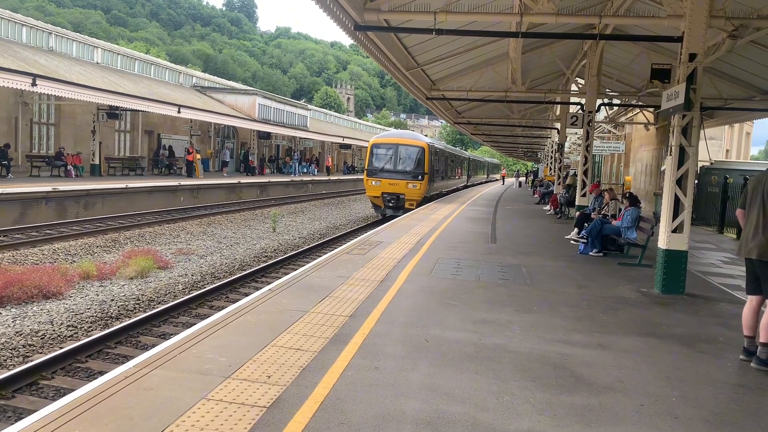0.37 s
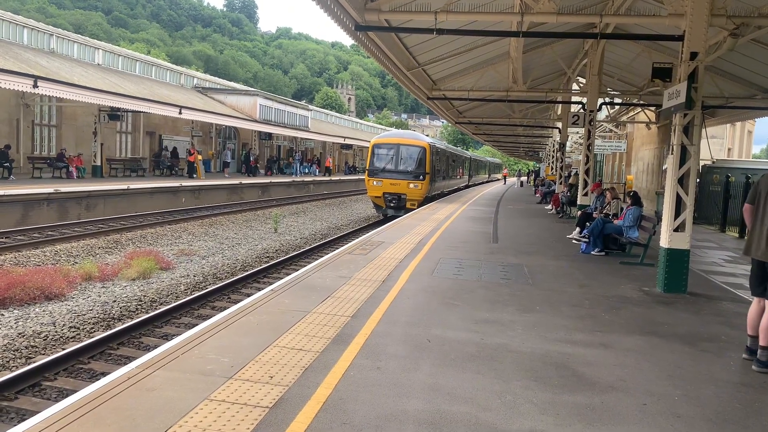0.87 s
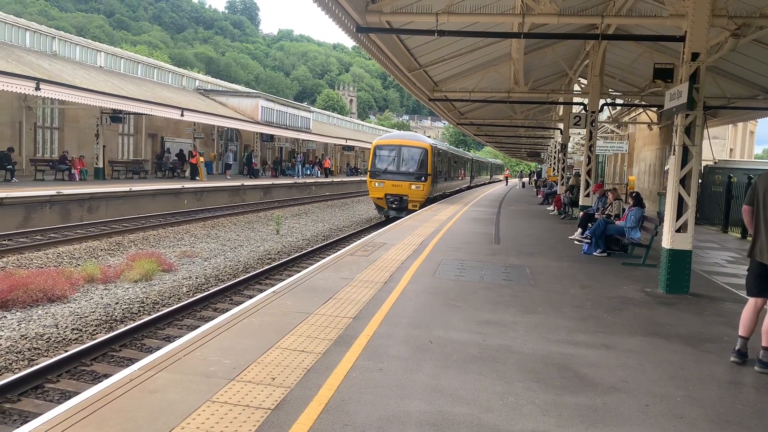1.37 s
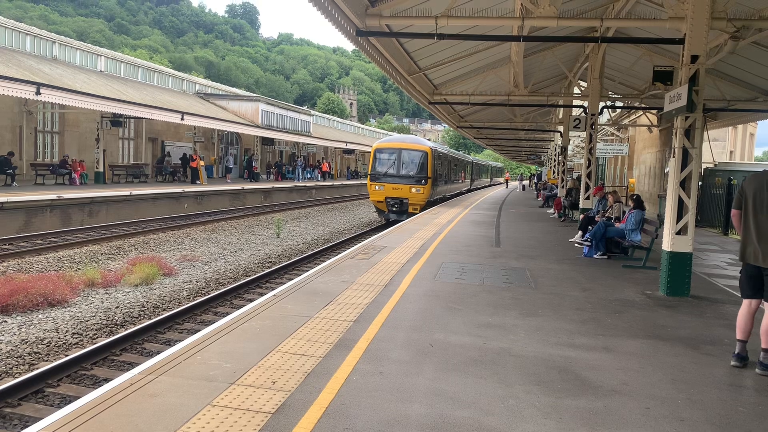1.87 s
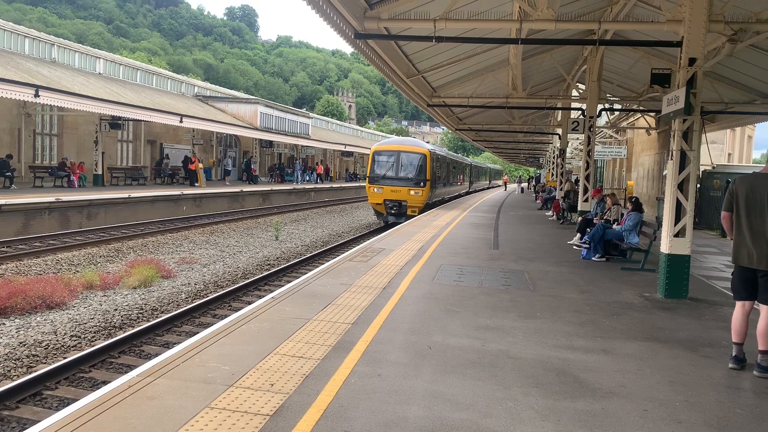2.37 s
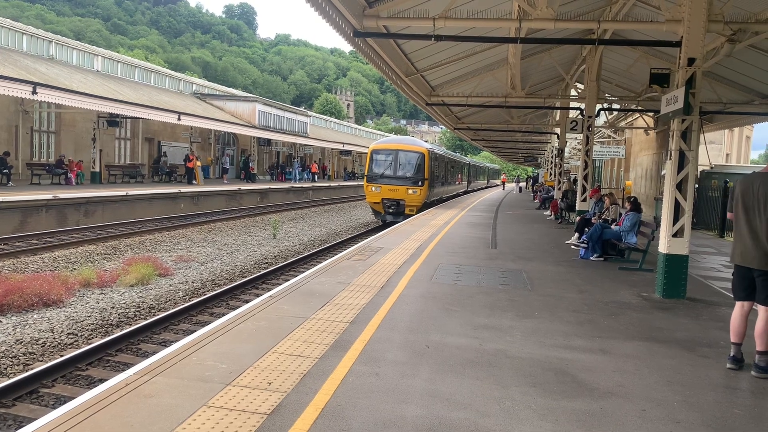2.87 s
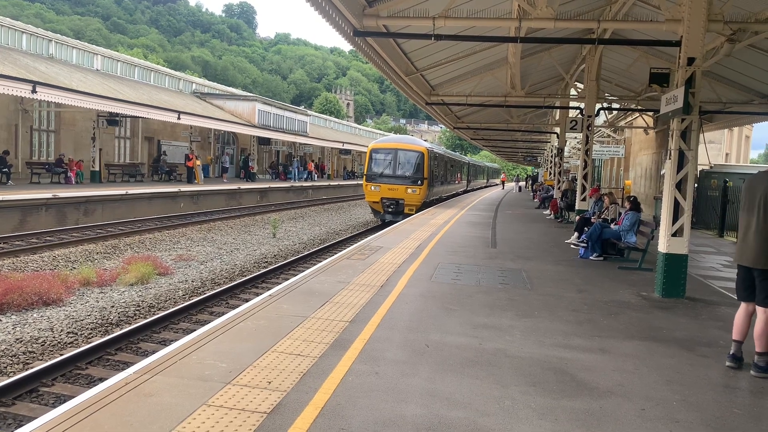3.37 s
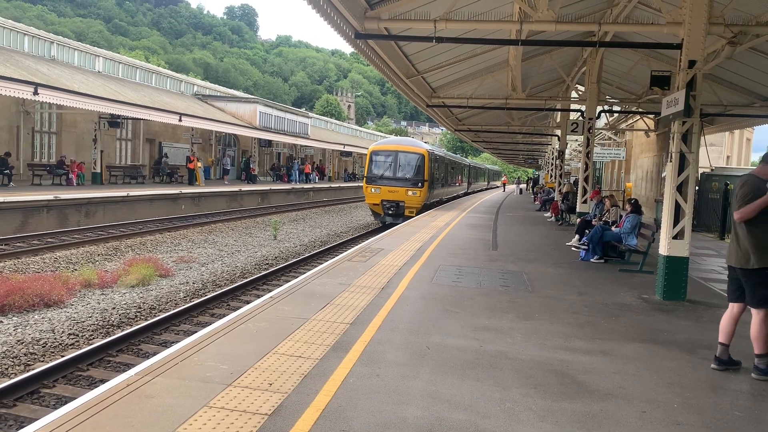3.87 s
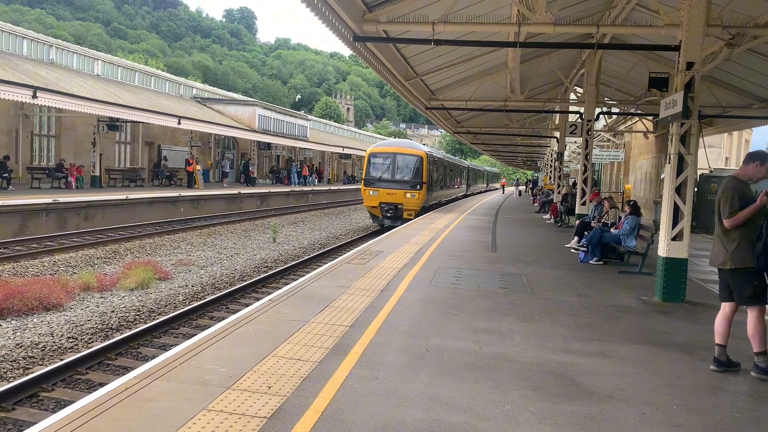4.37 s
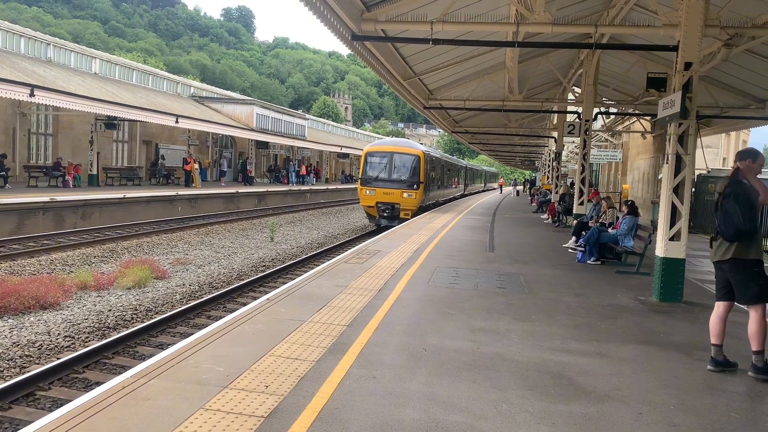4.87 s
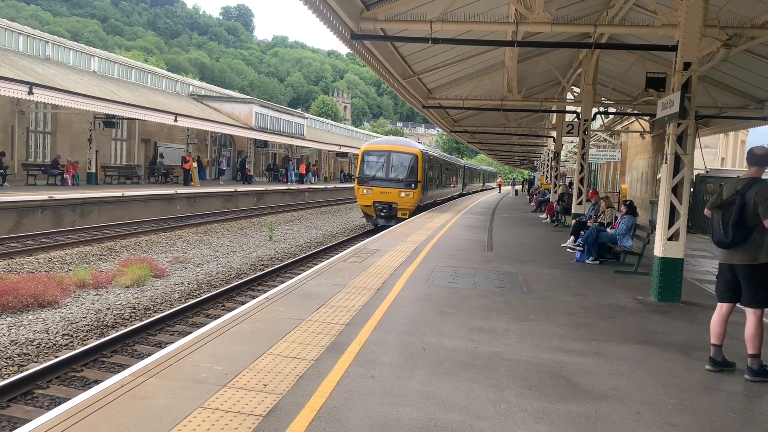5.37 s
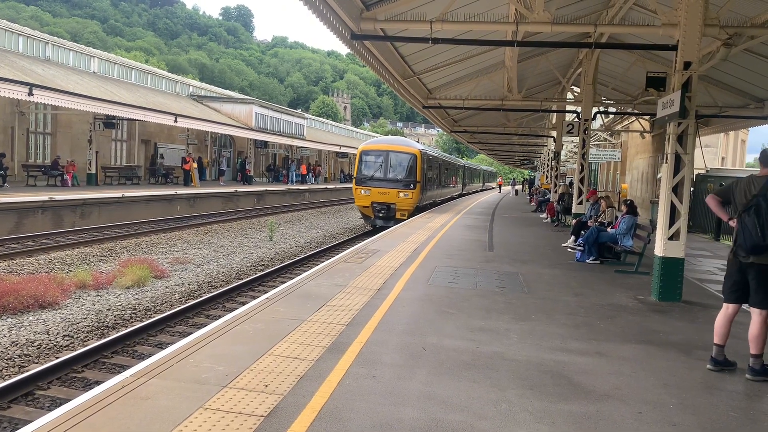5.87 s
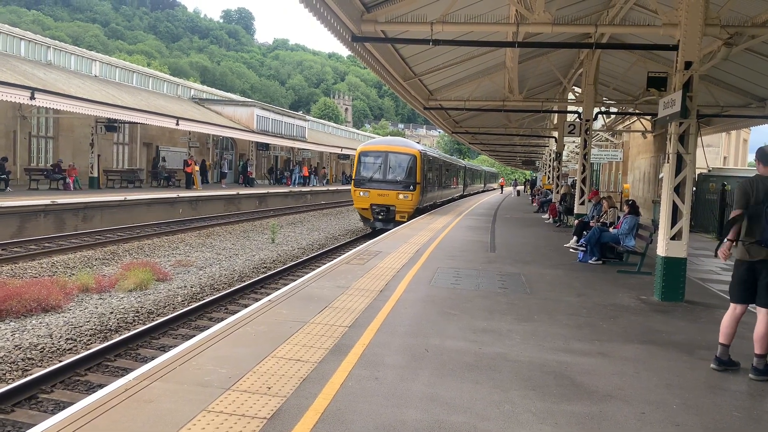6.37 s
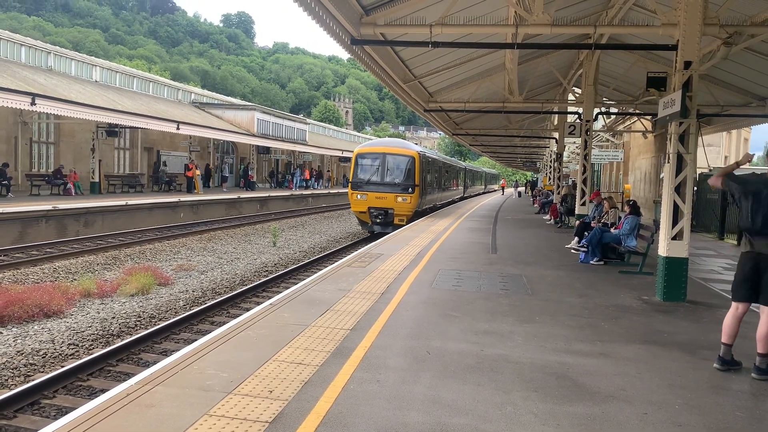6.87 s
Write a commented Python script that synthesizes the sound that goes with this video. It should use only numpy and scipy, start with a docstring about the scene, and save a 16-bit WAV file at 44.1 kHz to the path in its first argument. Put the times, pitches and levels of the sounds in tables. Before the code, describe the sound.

Several diesel engines throb slightly out of tune beneath a station roof, heard from the platform by a small stereo microphone. Air is released briefly near the start, with a faint rub and rustle; dull metal knocks and a second squeak follow. Thin whines waver and slide down through the middle. Later the engines surge, low drones swell, gears whine upward and a breathy turbo whistle rises through the end.

```python
"""Beating engine drones over a broad roar, then a hiss and two squeaks: a diesel train rolls into a roofed platform.
The engine notes mostly sink, then climb: sines locked to four firing rates, plus gliding exhaust hums.
Gears whine as narrow gliding lines and two turbos as breathy ones; valve, rustles, growl, roar and a faint
top hiss are coloured noise. Knocks are decaying sines; squeaks are harmonic stacks.
Two closely spaced microphone ports hear it all.
"""
import sys
import numpy as np
from scipy import signal
from scipy.fft import rfft, irfft, next_fast_len
from scipy.io import wavfile
from scipy.ndimage import uniform_filter1d, map_coordinates

SR = 44100
rng = np.random.default_rng(int(sys.argv[2]) if len(sys.argv) > 2 else 0)


def ratio_of_db(decibels):
    """Turn decibels (scalar or array-like) into linear amplitude factors; 0 dB maps to 1."""
    return 10 ** (np.asarray(decibels, float) / 20)


def file_out(sig):
    """Save sig as 16-bit WAV at sys.argv[1]."""
    # one column per channel
    cols = np.atleast_2d(sig).T
    # limit, then scale
    lim = np.clip(cols, -1, 1)
    pcm = np.round(lim * 32767).astype(np.int16)
    wavfile.write(sys.argv[1], SR, pcm)


N = 308700  # samples, 7 s


def unit(x):
    """Scaled to rms 1."""
    return x / np.sqrt(np.mean(x ** 2) + 1e-20)


def curves(rows):
    """One value per sample for each column after the time."""
    s, *cols = np.transpose(rows)
    return [np.interp(np.arange(N) / SR, s, c) for c in cols]


def along(points, hz):
    """Each column after the frequency, interpolated on a log frequency axis."""
    f, *cols = np.transpose(points)
    return [np.interp(np.log(hz + 1), np.log(f + 1), c) for c in cols]


def swells(rows):
    """Sum of bell-shaped swells of (time, height, half length)."""
    t = np.arange(N) / SR
    return sum(height * np.exp(-((t - s) / half_s) ** 2) for s, height, half_s in rows)


def wobble(knots_per_s):
    """Smooth random curve through normally distributed knots."""
    knots = rng.standard_normal(int(N * knots_per_s / SR) + 4)
    return map_coordinates(knots, [np.arange(N) * knots_per_s / SR])


def noise(spectrum, patchy_db):
    """Two unrelated coloured noises, jointly rms 1, sharing time-frequency patches of random gain."""
    hz, _, z = signal.stft(rng.standard_normal((2, N)), SR, nperseg=4096)
    patches = unit(uniform_filter1d(rng.standard_normal(z.shape[1:]), size=25, axis=0))
    gain = ratio_of_db(along(spectrum, hz)[0][:, None] + patchy_db * patches)
    return unit(signal.istft(z * gain, nperseg=4096)[1][:, :N])


def tone(cycles, db):
    """Sine from a running phase [cycles] and an rms level [dB]."""
    return np.sqrt(2) * ratio_of_db(db) * np.sin(2 * np.pi * cycles)


# (time [s], gain [dB])
NEARNESS = [(0, 0), (.35, 0), (.65, 0.5), (2, 0.5), (4.4, -0.18), (4.8, 1), (5.4, 2), (6.4, 3.5), (7, 3.5)]


def nearness_db():
    """Nearness of the train; each dependent layer scales it by its own growth."""
    return curves(NEARNESS)[0]


# one table per engine: (time [s], firing rate [Hz], drone level [dB])
ENGINES = [
    [(0, 46.77, -42.5), (.25, 47.15, -40), (.5, 46.83, -50), (1, 42.07, -37), (1.25, 40.43, -31.5),
     (1.6, 39.88, -38.5), (2, 38.56, -42), (2.3, 37.9, -35.5), (2.6, 37.52, -36), (2.85, 37.51, -45),
     (3.2, 37.33, -45), (3.45, 37.05, -39), (3.75, 36.76, -37.5), (4.3, 36.51, -32.5), (5, 38.32, -41),
     (5.5, 39.35, -31.5), (5.75, 39.8, -40), (6, 40.55, -30.5), (6.3, 40.9, -38), (6.45, 41.1, -41),
     (6.7, 41.92, -37.5), (6.85, 41.6, -36.5), (7, 41.8, -39)],
    [(0, 48.9, -36), (.5, 47.4, -35.5), (1.2, 47.65, -32), (1.55, 50.95, -41), (1.8, 52.62, -30),
     (2.25, 54.04, -76), (3, 53.9, -36.5), (3.75, 51.15, -60), (4.3, 48.64, -35), (4.5, 50.3, -38),
     (4.75, 51.92, -40), (5, 56.77, -26), (5.2, 59.75, -25.5), (5.35, 60.74, -20), (5.5, 61.88, -17),
     (5.7, 64.1, -18.5), (5.85, 65.7, -23), (6, 67.4, -28.5), (6.15, 68.17, -26.5), (6.35, 69.07, -28),
     (6.5, 69.9, -32), (6.75, 70.13, -25.5), (7, 72.4, -29)],
    [(0, 41.75, -41), (1.2, 39.3, -43), (2, 50.6, -38), (3, 48.6, -56), (3.75, 44.85, -37),
     (4.5, 44.7, -38), (4.75, 47.05, -42), (5, 49.83, -41), (5.15, 48.8, -47), (5.3, 54.6, -28),
     (5.5, 56.83, -30), (5.75, 59.26, -32), (5.9, 58.74, -20.5), (6, 61.2, -34), (6.1, 60.9, -21),
     (6.3, 59.2, -34), (6.5, 63.9, -24.5), (6.75, 65.7, -29), (7, 65.6, -29)],
    [(0, 37, -79), (2.5, 38.7, -66), (3.5, 39.6, -58), (4.25, 39.2, -44), (4.75, 38.9, -37),
     (5.25, 46.2, -44), (5.45, 48.1, -35), (6, 51.25, -35), (6.25, 53.9, -39), (6.5, 54.3, -48.5),
     (7, 61, -43)],
]
CRANK_TIME_S, CRANK_CYCLES = 5.5, [0, 1.214, .106, .106]  # firing-cycle position of each engine then


def crank():
    """Integrates each firing rate to phase [cycles], pinned at CRANK_TIME_S."""
    speeds_hz, drone_dbs = zip(*[curves(rows) for rows in ENGINES])
    cycles = []
    for hz, start in zip(speeds_hz, CRANK_CYCLES):
        turn = np.cumsum(hz) / SR
        cycles.append(turn - turn[round(CRANK_TIME_S * SR)] + start)
    return speeds_hz, drone_dbs, cycles


# multiple of the firing rate on which each engine drones
DRONE_ORDERS = [4, 1, 1, 1]


def drones(cycles, drone_dbs):
    """One firing-locked sine per engine; unequal rates beat."""
    return sum(tone(k * turn, db) for k, turn, db in zip(DRONE_ORDERS, cycles, drone_dbs))


# multiples of the first engine's firing rate
STRONG_ORDERS = [2, 3, 5, 6, 7]
# (time [s], then level of orders 2, 3, 5, 6, 7 [dB])
HAULING_NOTES = [(0, -50, -40, -43.5, -60, -42.5), (.3, -37, -47, -36.5, -48, -46.5),
                 (.55, -45, -41.5, -49, -54, -58), (.7, -36.5, -57, -51.5, -63, -55),
                 (1, -43, -51, -38.5, -49, -51), (1.2, -54, -45, -44, -47, -48),
                 (1.401, -51, -60, -42, -48, -44), (1.55, -44, -62, -45, -36.5, -37.5),
                 (1.7, -35, -58, -47, -45.5, -52), (1.85, -41, -62, -33.5, -44, -68),
                 (2, -33, -48, -40.5, -42, -68), (2.2, -48, -56, -39, -55, -64),
                 (2.45, -33.5, -58, -48, -61, -59), (2.65, -35.5, -60, -42, -52, -60),
                 (2.87, -44, -52, -60, -49, -60), (3.1, -32.5, -46, -48, -44.5, -62),
                 (3.32, -39.5, -48, -56, -48, -60), (3.5, -34, -52, -47, -42, -56),
                 (3.8, -40.5, -59, -50, -53, -47), (4, -35, -53, -58, -45.5, -52),
                 (4.35, -40, -54, -59, -54, -59), (4.551, -35.5, -50, -60, -39, -45),
                 (4.75, -41, -45, -49, -57.5, -51), (4.95, -45, -44, -43.5, -45, -53),
                 (5.25, -32, -51, -38, -56, -48), (5.5, -50, -42, -43, -56, -49),
                 (5.8, -41, -41, -59, -46.5, -49), (6.05, -39, -40, -46, -37, -51),
                 (6.2, -44, -60, -37, -41.5, -39), (6.32, -60, -60, -38.5, -34.5, -43),
                 (6.5, -44, -62, -39, -40, -56), (6.7, -39, -55, -37.5, -47, -39),
                 (6.9, -41, -57, -52, -34.5, -44), (7, -50, -50, -50, -37, -53)]


def hauling_notes(cycles):
    """Strong overtones of the hauling (first) engine; each swells and fades on its own curve."""
    return sum(tone(k * cycles[0], db) for k, db in zip(STRONG_ORDERS, curves(HAULING_NOTES)))


# pipe and platform resonances: (frequency [Hz], gain [dB])
PIPES = [(58, -11), (62, 6.5), (67, -2), (76, -12), (84, -19), (96, -12), (112, 5), (128, 1), (141, -6),
         (150, 21), (163, 0), (183, -2), (255, -7), (280, -4), (300, -10), (335, 8.5)]
OVERTONES_GROW = 0.81  # dB per dB of nearness
WAVER_DB, WAVER_KNOTS_PER_S = 2, 5


def overtones(speeds_hz, cycles):
    """Weaker firing multiples, swelling as they cross resonances of pipe and platform."""
    near_db = OVERTONES_GROW * nearness_db()
    out = np.zeros(N)
    # (engine index, order, level before resonance and nearness [dB])
    for engine, k, base_db in [(0, 5 / 3, -48.5), (1, 1.5, -51.5), (1, 2, -52), (1, 2.5, -64)]:
        pipe_db = along(PIPES, k * speeds_hz[engine])[0]
        waver_db = WAVER_DB * wobble(WAVER_KNOTS_PER_S)
        out += tone(k * cycles[engine], base_db + pipe_db + near_db + waver_db)
    return out


# one table per hum: (time [s], frequency [Hz], level [dB])
HUMS = [
    [(0, 71.8, -52), (.8, 71.5, -46), (1.1, 72.5, -39), (1.3, 70.5, -57)],
    [(2.3, 105.4, -72), (2.6, 106.4, -46), (3.1, 107.5, -49), (3.6, 108.1, -45), (3.9, 105.5, -45),
     (4.25, 102, -42), (4.45, 101.2, -70)],
    [(2.3, 242, -72), (2.55, 245.4, -44), (3.2, 246.2, -54), (3.9, 248, -45), (4.15, 247, -72)],
    [(2.05, 324, -59), (2.25, 322, -41.5), (2.6, 321.5, -45), (3.6, 309, -52.5), (3.9, 312, -48),
     (4.1, 310, -68)],
    [(5.8, 99.4, -68), (6, 97.5, -38), (6.15, 100, -38), (6.35, 102.4, -52), (6.7, 105.1, -51),
     (6.9, 107, -42), (7, 106.5, -47)],
    [(6.1, 311, -66), (6.3, 315, -48), (6.45, 325, -42), (6.6, 327.7, -37), (6.8, 329.5, -38),
     (6.9, 333, -44), (7, 337, -49)],
    [(5.7, 263.3, -63), (5.9, 266.7, -44), (6.1, 269, -41), (6.3, 275, -40), (6.5, 275, -61),
     (6.65, 273, -70)],
    [(5.85, 340, -86), (6.05, 342, -47), (6.4, 344.5, -41), (6.5, 342.7, -59), (6.6, 348, -32),
     (6.7, 349, -52), (6.8, 348.7, -37), (7, 346, -63)],
]


def hums():
    """Further exhaust hums: gliding sines that come and go."""
    return sum(tone(np.cumsum(hz) / SR, db) for hz, db in map(curves, HUMS))


def engines(speeds_hz, drone_dbs, cycles):
    """Exhaust notes: periodic firing pulses heard as sums of sines."""
    steady = drones(cycles, drone_dbs) + hauling_notes(cycles) + hums()
    return steady + overtones(speeds_hz, cycles)


PITCH_WANDER, PITCH_KNOTS_PER_S = .0025, 9  # wander as a share of pitch


def whistle(rows, width_hz, clean, flutter_db):
    """Gliding line: a clean share, a quarter cycle apart in the pair, plus narrow-band breath."""
    hz, db = curves(rows)
    wander = 1 + PITCH_WANDER * wobble(PITCH_KNOTS_PER_S)
    turn = 2 * np.pi * np.cumsum(hz * wander) / SR
    pair = []
    for lag in (0, np.pi / 2):
        breath = unit(wobble(width_hz) * np.sin(turn) + wobble(width_hz) * np.cos(turn))
        pair.append(clean * np.sqrt(2) * np.sin(turn + lag) + (1 - clean) * breath)
    return ratio_of_db(db + flutter_db * wobble(28)) * unit(np.array(pair))


BEAT_WANDER = .3  # share of the beat rate


def beating(share, beats_per_s):
    """Gain of a line that a weaker twin alternately helps and cancels; mean power 1."""
    turn = 2 * np.pi * np.cumsum(beats_per_s * (1 + BEAT_WANDER * wobble(7))) / SR
    return np.abs(1 + share * np.exp(1j * turn)) / np.sqrt(1 + share ** 2)


# one table per gear whine: (time [s], frequency [Hz], level [dB])
WHINES = [
    [(1.3, 1153, -58), (1.55, 1172, -49), (1.75, 1167, -66), (1.92, 1190, -46.5), (2.03, 1185, -54),
     (2.1, 1185, -47), (2.31, 1195, -45.5), (2.37, 1190, -55), (2.54, 1188, -57), (2.6, 1180, -48),
     (2.68, 1183, -54), (2.75, 1170, -57), (2.87, 1167, -47), (3.03, 1157, -49.5), (3.13, 1138, -55),
     (3.22, 1135, -44), (3.3, 1136, -43), (3.36, 1135, -50), (3.44, 1124, -43), (3.53, 1100, -43.5),
     (3.65, 1116, -43.5), (3.73, 1104, -41), (3.79, 1092, -52), (3.87, 1082, -42), (3.95, 1087, -53),
     (4.1, 1082, -47), (4.3, 1067, -50), (4.45, 1074, -73)],
    [(4.45, 1078, -73), (4.56, 1096, -46), (4.62, 1102, -41), (4.7, 1113, -52), (4.78, 1132, -43),
     (4.83, 1145, -44), (4.9, 1176, -55), (5.0, 1205, -48), (5.06, 1229, -47), (5.1, 1266, -39),
     (5.16, 1300, -49), (5.28, 1320, -34.5), (5.35, 1342, -46), (5.44, 1382, -43), (5.55, 1382, -44.5),
     (5.7, 1398, -49), (5.9, 1445, -46.5), (6.3, 1513, -51), (7.0, 1597, -54)],
    [(5.6, 1260, -75), (6.0, 1340, -45), (6.2, 1334, -58), (6.4, 1317, -46), (6.6, 1370, -50),
     (6.75, 1392, -42), (7.0, 1403, -58)],
    [(4.95, 1250, -63), (5.15, 1260, -50), (5.3, 1284, -48), (5.4, 1325, -41), (5.5, 1317, -43),
     (5.58, 1345, -42), (5.7, 1368, -42), (5.85, 1375, -56), (6, 1370, -75)],
    [(5.6, 1026, -86), (5.75, 1037, -47.5), (6.35, 1050, -48), (6.5, 1022, -65)],
    [(3.8, 1760, -75), (3.95, 1756, -55), (4.15, 1752, -55), (4.3, 1755, -54.5), (4.4, 1752, -53.5),
     (4.47, 1754, -53), (4.55, 1758, -56), (4.68, 1760, -56), (4.75, 1755, -69)],
    [(3.75, 1177, -70), (3.85, 1176, -53), (4.1, 1166, -49), (4.2, 1155, -68)],
]
# pure-line share of each whine
WHINE_CLEAN = [.9, .75, .4, .7, .5, .5, .6]
# twin gear nearly in step, per whine: (twin's share, beat rate [1/s])
WHINE_BEATS = [(.5, 14), (.9, 20), (.4, 18), (.8, 22), (.4, 16), (.75, 13), (.5, 15)]


def gears():
    """Gear teeth sing as narrow gliding lines, beaded by beats."""
    out = np.zeros((2, N))
    for rows, clean, (share, beats_per_s) in zip(WHINES, WHINE_CLEAN, WHINE_BEATS):
        line = whistle(rows, width_hz=80, clean=clean, flutter_db=1.2)
        out += beating(share, beats_per_s) * line
    return out


# one table per turbo: (time [s], frequency [Hz], level [dB])
TURBOS = [
    [(1.9, 5700, -85), (2.2, 5850, -68), (2.8, 6200, -67), (3.5, 6650, -65), (4.3, 6600, -67),
     (4.65, 6850, -65), (5.0, 7600, -65), (5.5, 8550, -60.5), (5.7, 8980, -60), (6.0, 9600, -61),
     (6.5, 10450, -60), (7.0, 10900, -59)],
    [(5.4, 7200, -85), (5.85, 8000, -65), (6.3, 8800, -66), (7.0, 9500, -65)],
]


def turbos():
    """Spooling turbos whistle as wide, breathy rising lines."""
    return sum(whistle(rows, width_hz=390, clean=.1, flutter_db=1.5) for rows in TURBOS)


# (time [s], level [dB])
VALVE = [(.44, -95), (.48, -58), (.62, -62), (.8, -63), (1.1, -69), (1.3, -95)]
# jet spectrum: (frequency [Hz], relative density [dB per Hz])
JET = [(6500, -34), (7500, 0), (8600, 3), (9400, 10), (10200, 2), (12500, -34), (14000, -28)]


def valve():
    """Compressed air: a treble noise burst that opens fast and bleeds away."""
    return ratio_of_db(curves(VALVE)[0]) * noise(JET, patchy_db=1.5)


# (time [s], length [s], pitch [Hz], bright centre [Hz], bright half width [Hz], level [dB])
SQUEAKS = [(.58, .05, 508, 5200, 1200, -57.5), (1.89, .108, 622, 4130, 800, -53)]
PITCH_SAG, EDGE_S, FLICKER_DB = .016, .012, 1.5  # sag: share of pitch, at the start


def squeaks():
    """Rubbing squeaks: harmonics of an arched pitch, strong only inside a bright band."""
    out = np.zeros(N)
    k = np.arange(4, 14)[:, None]
    for s, length_s, hz, centre_hz, half_width_hz, db in SQUEAKS:
        t = np.arange(round(length_s * SR)) / SR
        pitch_hz = hz * (1 - PITCH_SAG * (2.2 * t / length_s - 1) ** 2)
        band = np.exp(-((k * hz - centre_hz) / half_width_hz) ** 2)
        flicker = ratio_of_db(FLICKER_DB * np.array([wobble(40)[:len(t)] for _ in k]))
        fade = np.clip(np.minimum(t, length_s - t) / EDGE_S, 0, 1)
        harmonics = band * flicker * tone(k * np.cumsum(pitch_hz) / SR, db)
        out[round(s * SR):][:len(t)] += fade * harmonics.sum(axis=0)
    return out


# (time [s], level [dB])
KNOCKS = [(1.418, -30), (2.356, -37), (2.43, -35), (6.136, -43)]
# metal frame modes: (frequency [Hz], relative level [dB], t60 [s])
FRAME = [(520, -5, 0.03), (850, 0, 0.045), (1180, -3, 0.025)]


def knocks():
    """Dull metal knocks: decaying frame modes, each strike slightly varied."""
    out = np.zeros(N + SR)
    t = np.arange(SR // 10) / SR
    for s, db in KNOCKS:
        ring = np.zeros(len(t))
        for hz, mode_db, t60_s in FRAME:
            decay = ratio_of_db(mode_db + rng.normal(0, 1.3) - 60 * t / t60_s)
            ring += decay * np.sin(2 * np.pi * hz * t)
        out[round(s * SR):][:len(t)] += ratio_of_db(db) * ring
    return out[:N]


# (time [s], level [dB], half length [s])
RUSTLES = [(0.61, -54.5, 0.12), (1.963, -56, 0.073)]
# (frequency [Hz], relative density [dB per Hz])
RUSTLE = [(2500, -33), (3500, 7), (4500, 7), (6000, -2), (7500, -25)]


def rustles():
    """Soft bell-shaped swells of mid-treble noise."""
    envelope = swells([(s, ratio_of_db(db), half_s) for s, db, half_s in RUSTLES])
    return envelope * noise(RUSTLE, patchy_db=1.5)


# (frequency [Hz], relative density [dB per Hz])
GROWL = [(250, -24), (320, 13), (380, 13), (430, 2.5), (520, -35.5)]
# (time [s], level [dB])
GROWL_LEVEL = [(0, -56), (.7, -51.5), (1.5, -48), (2.1, -54), (2.6, -87), (7, -64)]


def growl():
    """Rough low noise on its own level curve, fading after 1.5 s."""
    return ratio_of_db(curves(GROWL_LEVEL)[0]) * noise(GROWL, patchy_db=5.0)


# layer spectra, low to high: (frequency [Hz], relative density [dB per Hz])
RUMBLE = [(20, -56), (40, -3.5), (70, 0.5), (90, -5.5), (125, -6.5), (200, -6), (310, -8.5), (400, -12),
          (600, -92)]
BODY = [(250, -47), (450, 3), (580, -1), (800, 1.5), (1250, -4), (1500, -8.5), (2400, -7.5), (2800, -19.5),
        (3600, -51)]
RUSH = [(2000, -10), (2800, 4.5), (3600, -1.3), (5200, -5), (5900, -11.5), (7000, -7.5), (7600, -16),
        (8200, -49)]
AIRY = [(7000, -27), (7700, 2), (8600, 10.5), (9400, -3), (9800, 1), (10500, 1.5), (11200, -11),
        (12000, -6.5), (12600, -32)]
# (time [s], gain [dB], half length [s])
RUMBLE_SWELLS = [(5.7, 4, 0.66), (7, 1, 0.21)]


def roar(cycles):
    """Fans, wheels and combustion: broad noise mostly growing with nearness; two engines pulse its body."""
    near_db = nearness_db()

    def level(far_db, growth):  # growth: dB per dB of nearness
        return ratio_of_db(far_db + growth * near_db)

    firing = 1 + 0.012 * np.cos(2 * np.pi * cycles[0]) + 0.031 * np.cos(2 * np.pi * cycles[1])
    rumble = level(-35, .5) * ratio_of_db(swells(RUMBLE_SWELLS)) * noise(RUMBLE, patchy_db=1.5)
    body = level(-38.5, 0.92) * firing * noise(BODY, patchy_db=1.7)
    rush = level(-51, 1.3) * noise(RUSH, patchy_db=2.0)
    air = level(-65.5, 3.5) * noise(AIRY, patchy_db=5.0)
    return rumble + body + rush + air


# (frequency [Hz], relative density [dB per Hz])
TOP = [(11500, -10), (12300, -10), (13300, -7), (14300, -4), (15000, -4), (15700, 0)]
# stored loudness changes: (time [s], gain [dB], half length [s])
TOP_CHANGES = [(.9, -13, 0.78), (2.2, 5, 0.095), (3.1, 3, 0.23), (4.1, 1, 0.12), (4.4, 6, 0.12),
               (4.8, 6, 0.19), (5.4, 0, 0.24), (6.8, -5.5, .6)]


def top_hiss():
    """Faint top noise with stored and random loudness changes, rising with the nearness curve."""
    db = -65.5 + 5 * nearness_db() + swells(TOP_CHANGES) + 3.6 * wobble(4.8)
    return ratio_of_db(db) * noise(TOP, patchy_db=3.5)


def canopy(x):
    """Pair: the sound, and its return from roof and walls as a unit-energy decaying noise tail."""
    t = np.arange(SR // 2) / SR
    tail = rng.standard_normal(len(t)) * ratio_of_db(-60 * t / 1.6)  # t60 1.6 s
    return np.array([x, signal.fftconvolve(x, tail / np.linalg.norm(tail))[:N]])


# (frequency [Hz], likeness [-1..1], right port's lead [rad], left minus right [dB])
BASS_PORTS = [(60, .985, -.62, 0), (110, .96, -.5, .2), (150, .93, .6, .5)]
MIDDLE_PORTS = [(336, 0.97, 0.56, .4), (545, 0.45, 1.32, -2), (592, -0.37, 0.97, -5.5),
                (734, 0.75, -1.6, -3.5), (1100, 0.51, 0.53, -0.5), (1400, 0.17, -0.11, 0.5),
                (1800, 0.62, 0.67, -1.3), (2380, 0.13, 0.18, -0.5), (2730, -0.49, 0.35, 0),
                (3500, 0, .9, -2.5), (4200, 0.7, 0, -1.5), (4770, .35, 0.5, -8), (5670, -.3, -1.2, 2),
                (5900, 0.32, -2.3, -8), (6020, 0.9, 0.53, -8.5)]
# treble, phase climbing in steps as stored:
# (frequency [Hz], likeness [-1..1], phase between channels [rad], left minus right [dB])
TREBLE_PHASE = [(6800, .75, .3, 0), (7500, .7, 1.9, 0), (7900, .93, 2.9, 0), (8700, .95, 3.3, 0),
                (9700, .75, 4.7, 0), (10600, .95, 6.1, 0), (11400, .95, 6.4, 0), (12200, .7, 7.6, 0),
                (12800, .95, 9.3, 0), (13900, .95, 9.6, 0), (14800, .8, 11.2, 0), (15400, .95, 12.5, 0)]
TOP_HZ = 15750  # nothing passes above


def ports(pair):
    """Two channels share one part and oppose another, split by likeness, with phase and balance by band."""
    m = next_fast_len(N + 8192)
    hz = np.fft.rfftfreq(m, 1 / SR)
    likeness, phase_rad, balance_db = along(BASS_PORTS + MIDDLE_PORTS + TREBLE_PHASE, hz)
    mix_rad = np.arccos(np.clip(likeness, -1, 1)) / 2
    shared, opposed = rfft(pair, m) * [np.cos(mix_rad), np.sin(mix_rad)] * (hz < TOP_HZ)
    half = np.exp(.5j * phase_rad) * ratio_of_db(-balance_db / 2)  # half the offset to each channel
    return irfft([(shared + opposed) / half, (shared - opposed) * half], m)[:, :N]


def scene():
    """All sources at the two ports; only engines and knocks get the canopy return."""
    speeds_hz, drone_dbs, cycles = crank()
    under_roof = canopy(engines(speeds_hz, drone_dbs, cycles) + knocks())
    details = gears() + turbos() + valve() + squeaks() + rustles()
    return ports(under_roof + details + growl() + roar(cycles) + top_hiss())


def low_pass(x):
    """Removes everything above the highest recorded frequency."""
    return signal.sosfilt(signal.butter(12, 16780, fs=SR, output="sos"), x)


def record(dry):
    """The two-port mix as stored."""
    return low_pass(dry)


dry = scene()
out = record(dry)
file_out(out)
```